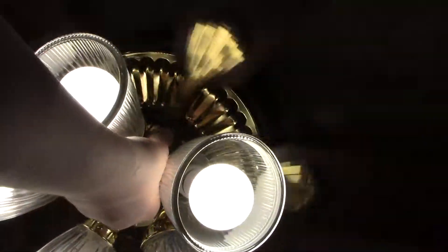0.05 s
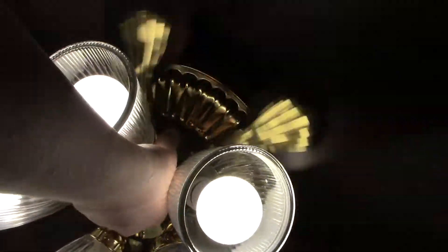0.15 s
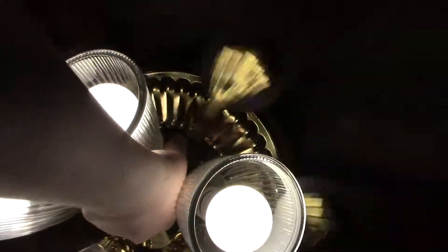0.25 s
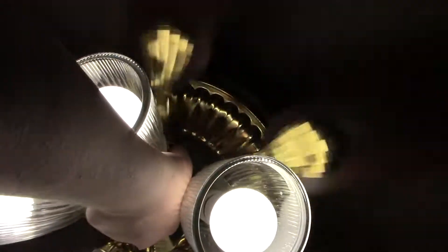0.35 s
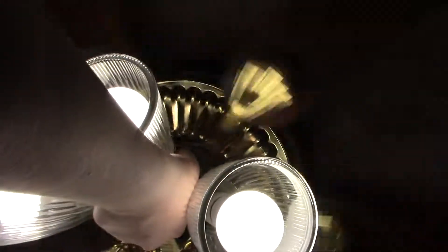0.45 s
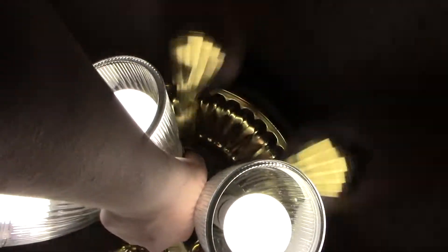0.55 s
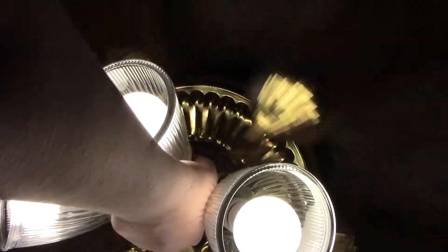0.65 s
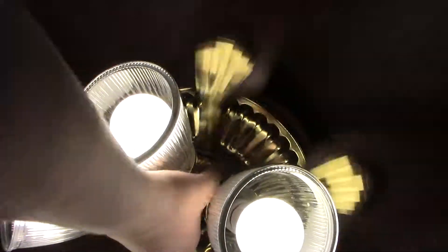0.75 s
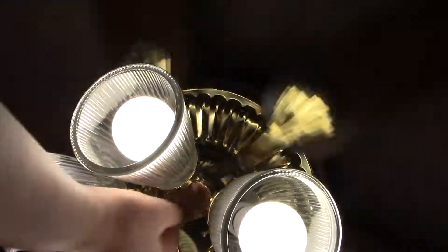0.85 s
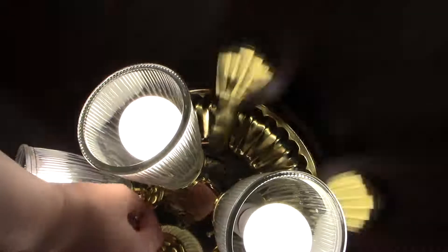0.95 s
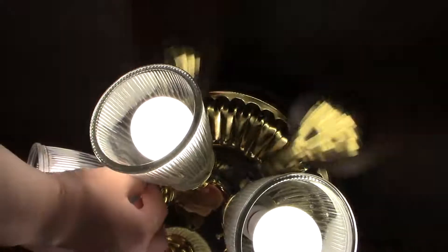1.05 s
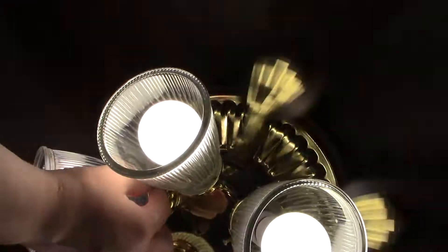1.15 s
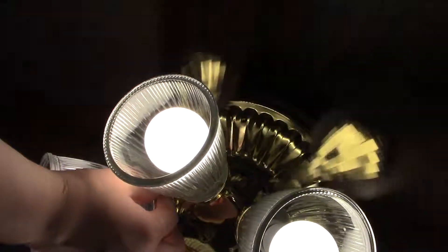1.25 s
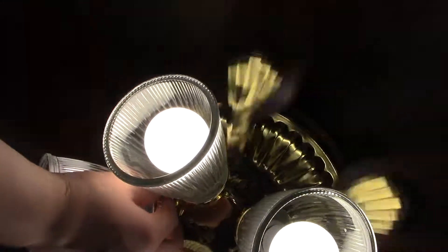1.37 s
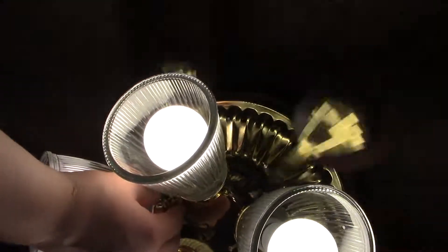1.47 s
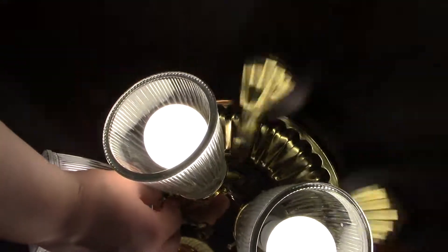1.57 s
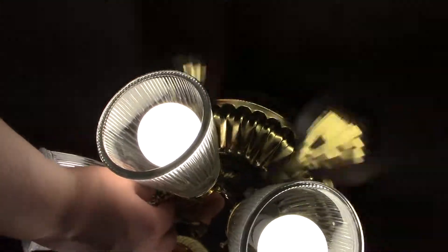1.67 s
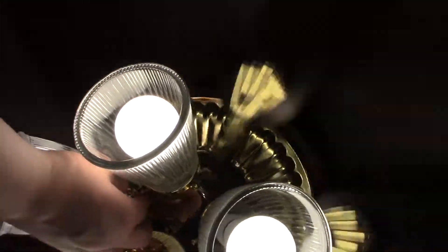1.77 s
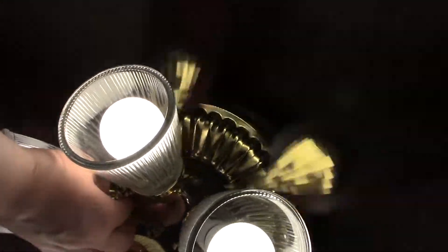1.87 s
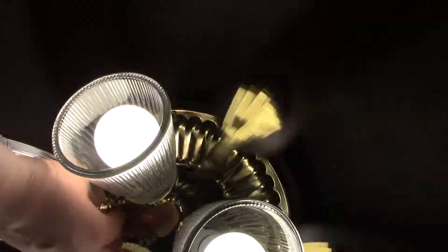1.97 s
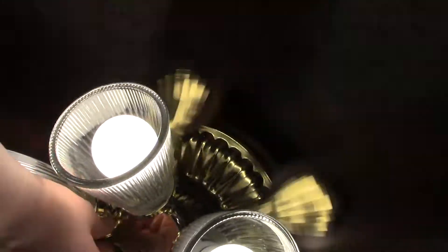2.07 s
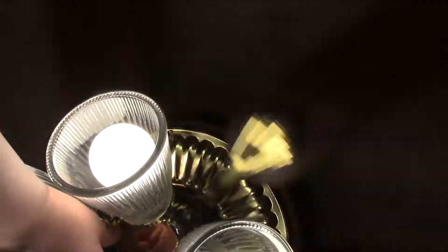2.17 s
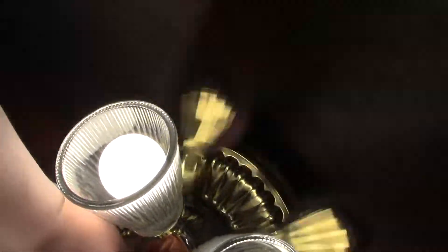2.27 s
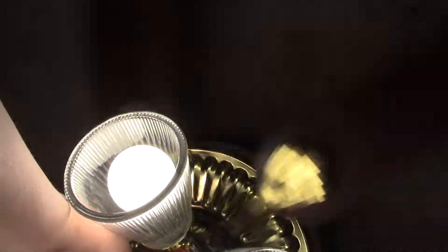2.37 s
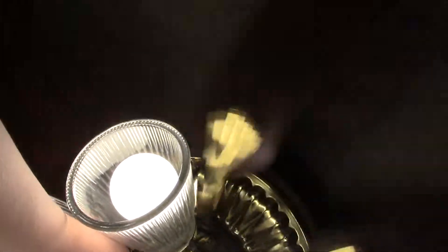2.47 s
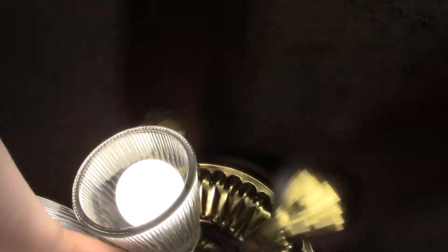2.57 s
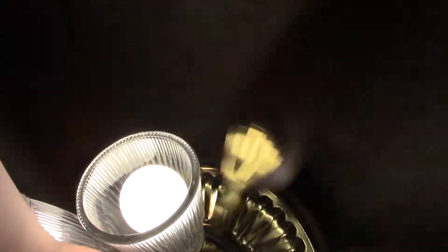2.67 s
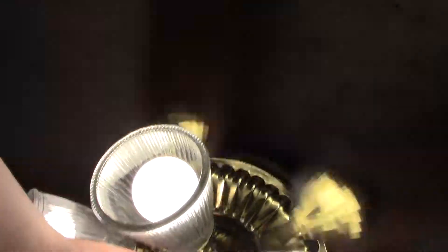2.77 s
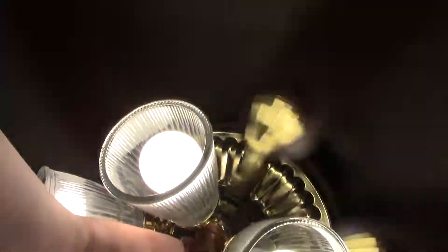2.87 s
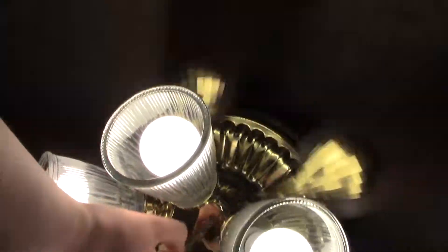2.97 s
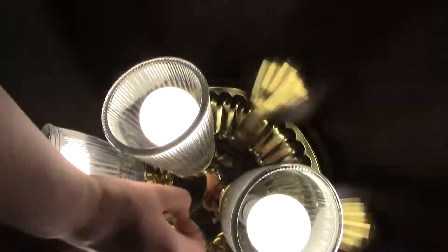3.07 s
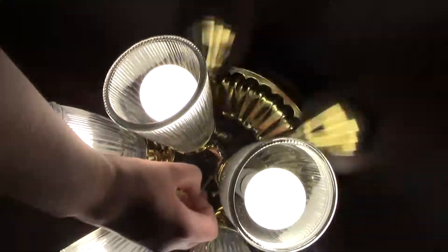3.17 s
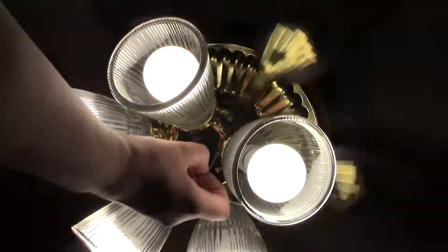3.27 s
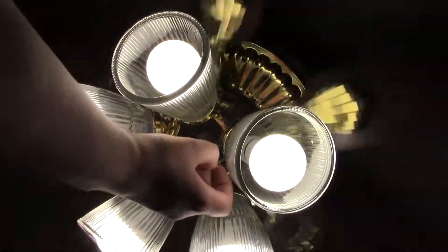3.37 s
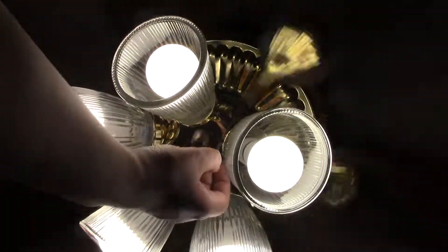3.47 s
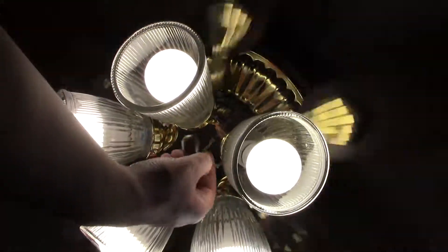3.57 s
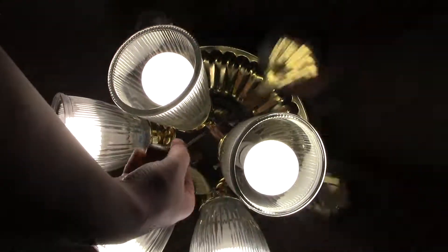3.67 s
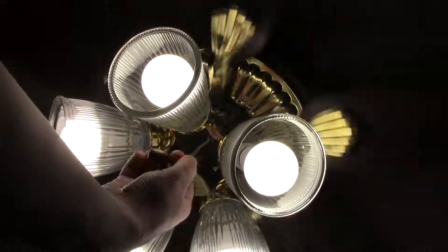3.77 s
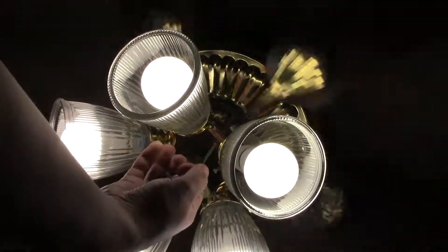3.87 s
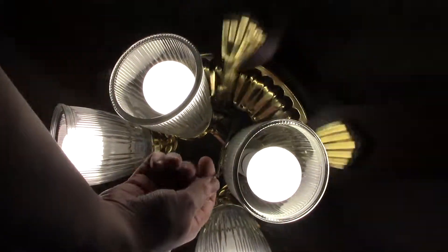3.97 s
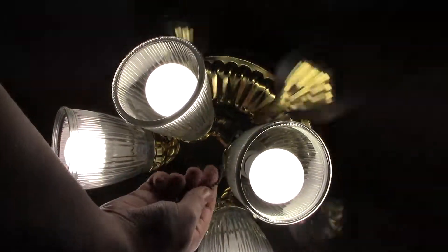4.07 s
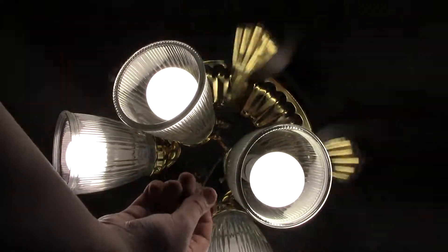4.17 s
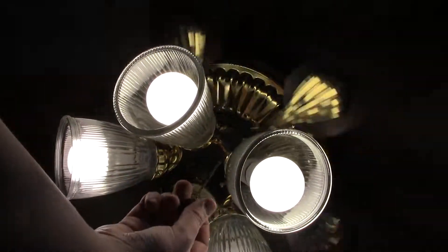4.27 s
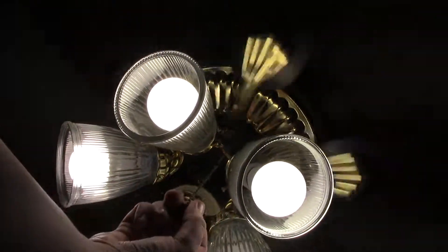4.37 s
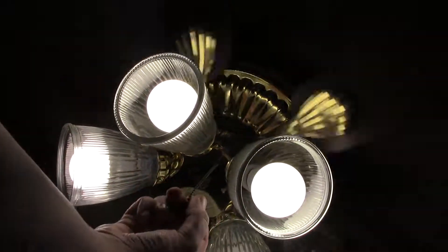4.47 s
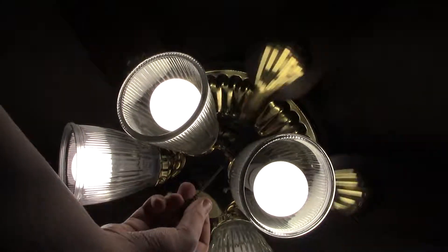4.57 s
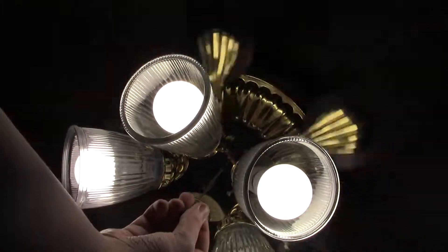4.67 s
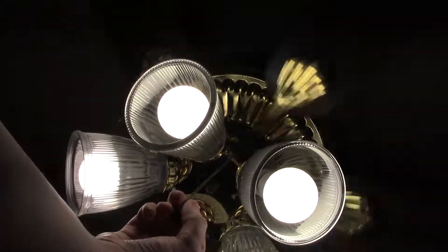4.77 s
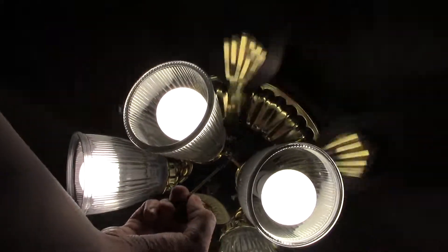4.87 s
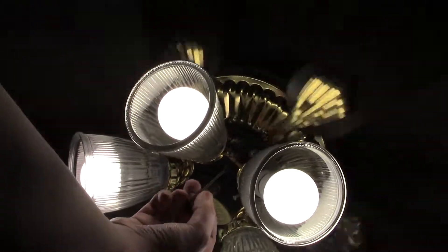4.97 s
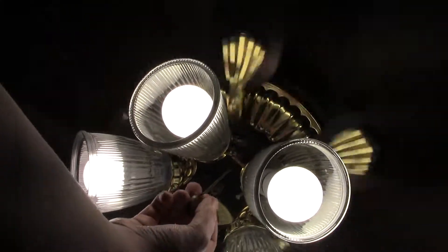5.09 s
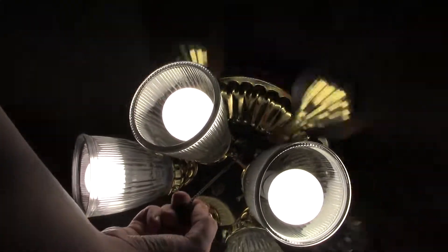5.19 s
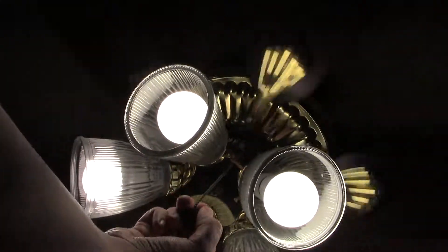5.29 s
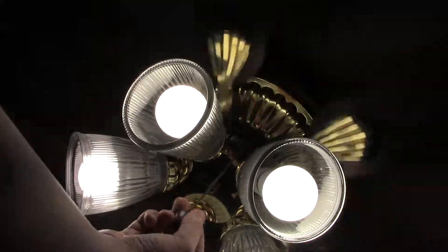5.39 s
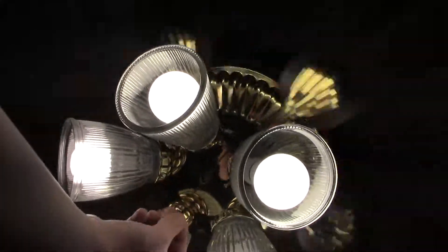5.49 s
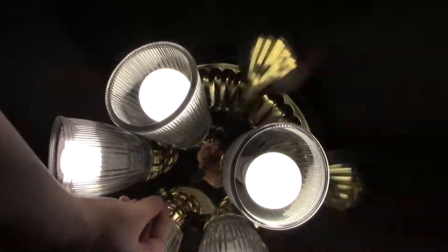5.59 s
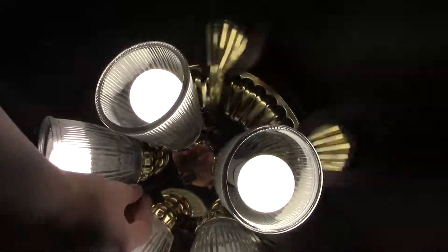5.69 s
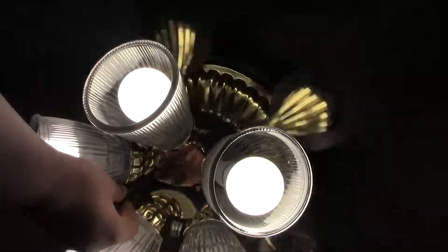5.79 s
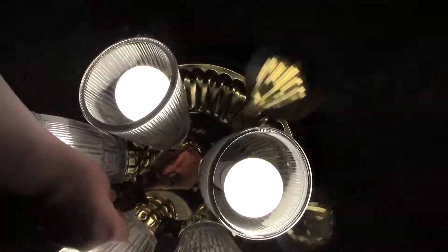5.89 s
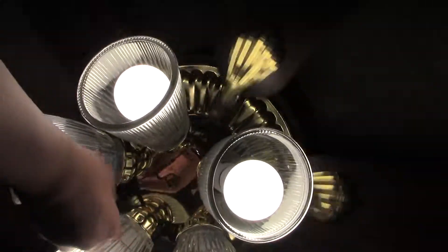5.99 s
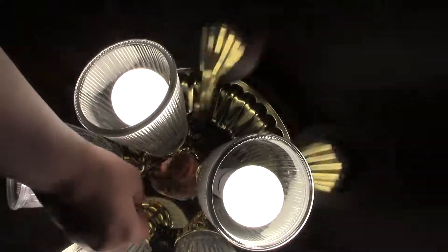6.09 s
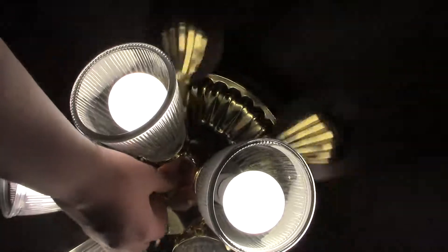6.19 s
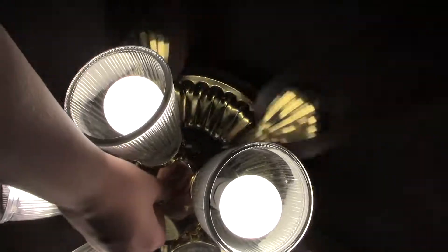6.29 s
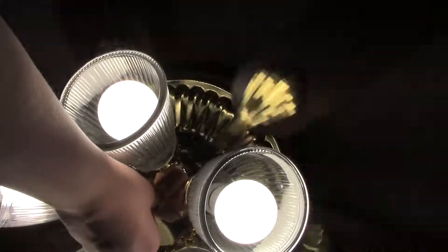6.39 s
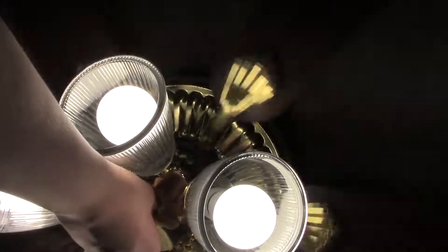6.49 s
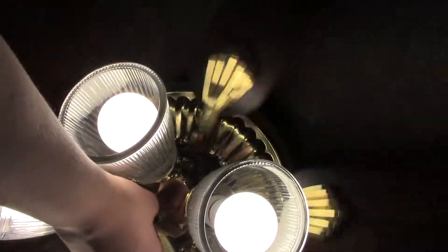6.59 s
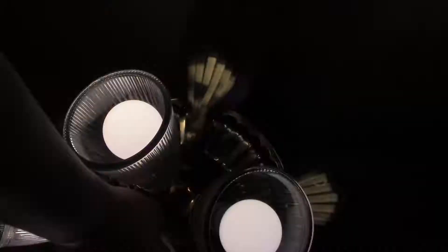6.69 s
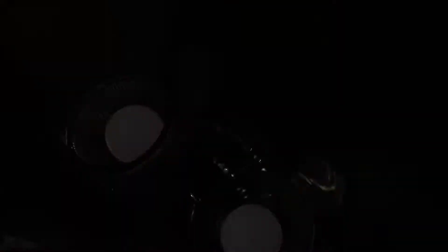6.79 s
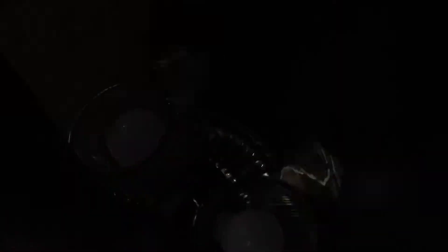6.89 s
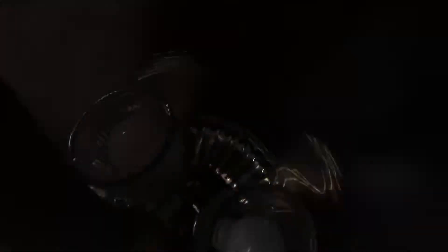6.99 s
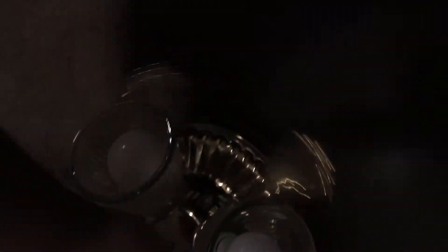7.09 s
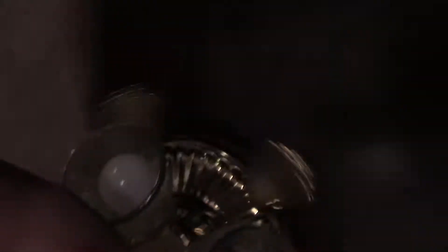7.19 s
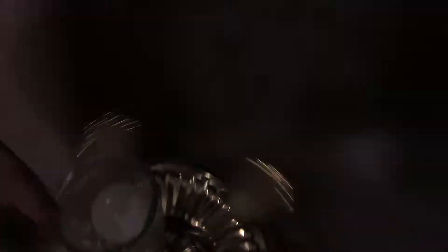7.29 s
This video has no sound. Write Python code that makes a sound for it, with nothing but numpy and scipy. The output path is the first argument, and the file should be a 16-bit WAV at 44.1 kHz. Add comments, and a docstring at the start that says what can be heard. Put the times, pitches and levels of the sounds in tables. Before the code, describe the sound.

Close to a ceiling fan's lamps, soft low air noise runs throughout. Light chain taps come first, then a sudden hard metallic and glassy clatter. After a few lighter tinkles, a pull chain ratchets over its brass lip and the switch snaps crisply several times. A bright jangle comes later, then soft rubbing, one more snap and a final knock. Dry, small indoor space, with a narrow stereo image.

```python
"""Pull chains under a ceiling fan

Close in a small room, a fan turns overhead with a wavering rush of air and a faint motor hum: shaped noise and sines.
A hand works the lamps' pull chains. Beads tinkle on glass and tick over the switch lip, and the switch snaps in its
brass housing: each contact rings damped modes under short noise, and the small room answers it with a grainy tail.
The microphone pair is close-spaced and nearly mono."""
import sys
import numpy as np
from scipy import signal
from scipy.fft import rfft, irfft, next_fast_len
from scipy.io import wavfile
from scipy.ndimage import map_coordinates

SR = 44100
rng = np.random.default_rng(int(sys.argv[2]) if len(sys.argv) > 2 else 0)


def wav_out(sig):
    """Save sig, one row per channel (or a flat mono array), as 16-bit PCM at SR to the path in sys.argv[1]."""
    wavfile.write(sys.argv[1], SR, np.round(np.clip(np.atleast_2d(sig).T, -1, 1) * 32767).astype(np.int16))


N = 323694

# ringing modes of the glass shades: pitch_hz, level_db, t60_s
GLASS = [(2536, -4.5, 0.132), (4210, -12.5, 0.11), (5340, -12, 0.37), (5660, -10, .09), (6020, -8, 0.12),
         (7170, -5, 0.12), (8780, -4.5, 0.15), (11170, -9.5, 0.12), (12300, -9.5, 0.18),
         (13380, -10.5, 0.1), (14150, -8.5, .11), (15340, -12.5, .08)]
# ringing modes of the brass housing: pitch_hz, level_db, t60_s
BRASS = [(624, -7, 0.29), (794, -3, 0.29), (980, -2, 0.068), (1113, -2, 0.26), (1323, 1.5, 0.14),
         (1690, -12, 0.21), (2228, -2, 0.093), (2334, -12, 0.12), (2396, -7.5, 0.073), (2697, -5.5, 0.096),
         (2910, -12, 0.048), (4177, -6.5, 0.16), (5000, -20.5, 0.13), (5530, -5.5, 0.19),
         (6950, -5.5, 0.11), (7720, -1.5, 0.12), (8740, -0.5, 0.055), (12100, -18, 0.028)]
# low register of contact noise: low_hz, high_hz, crack_db, crack_t60_s, tail_db, tail_t60_s
KNOCK = (694.5, 1804, -6.5, 0.0965, -26, 0.84)


def amp(db):
    """Gain of a level in dB."""
    return 10 ** (np.asarray(db) / 20)


def unit(x):
    """Scaled to rms 1."""
    return x / np.sqrt(np.mean(x ** 2) + 1e-20)


def along(points, hz):
    """Value at hz, read between (Hz, value) points on a log axis."""
    point_hz, value = np.transpose(points)
    return np.interp(np.log(hz + 1), np.log(point_hz + 1), value)


def wobble(rate):
    """A smooth random curve, rate knots a second."""
    knots = rng.standard_normal(int(N * rate / SR) + 4)
    return map_coordinates(knots, [np.arange(N) * rate / SR])


def filtered(x, response):
    """x shaped by a complex response of frequency."""
    m = next_fast_len(N + SR // 2)
    return irfft(rfft(x, m) * response(np.fft.rfftfreq(m, 1 / SR)), m)[..., :N]


def resonance(f, hz, width_hz):
    """Causal response of one resonance, 1 at its centre."""
    return 1j * f * width_hz / (hz * hz - f * f + 1j * f * width_hz)


def impulses(s, height):
    """A single-sample impulse of the given height at each time s."""
    return np.bincount(np.round(s * SR).astype(int), height, N)[:N]


def nearness(mode_hz, hz, width):
    """1 where a mode lies on the pitch struck, falling off over width in log frequency."""
    return np.exp(-(np.log(mode_hz / hz) / width) ** 2)


def ring(modes, s, levels_db, scatter_db, rough, shift=None, attack=0.00082, linger_db=-9):
    """Every blow at times s rings the modes at uneven levels; loose joints make their phase wander."""
    out = np.zeros(N + SR)
    t = np.arange(4800) / SR
    hz, db, t60 = np.transpose(modes)[..., None]
    # the contact damps most of the ring at once
    dying = amp(-60 * t / (0.23 * t60)) + amp(linger_db - 60 * t / t60)
    onset = 1 - np.exp(-t / attack)
    fade_out = np.cos(np.pi / 2 * t / t[-1])
    envelope = amp(db) * dying * onset * fade_out
    shift = np.ones(len(s)) if shift is None else shift
    chances = rng.standard_normal((len(s), len(modes), 152))
    for start, level, scale, chance in zip(s, levels_db, shift, chances):
        wander = np.repeat(np.cumsum(rough * chance[:, 2:], axis=1), 32, axis=1)
        mode_hz = hz * scale * (1 + .004 * chance[:, :1])
        tones = np.sin(2 * np.pi * mode_hz * t + wander + 2 * chance[:, :1])
        uneven = amp(level + scatter_db * chance[:, 1:2])
        out[round(start * SR):][:len(t)] += np.sum(uneven * envelope * tones, axis=0)
    return out[:N]


def burst(s, level_db, register):
    """Noise of one register: a crack at every blow, then a longer, grainy tail in the colour of the housing."""
    lo_hz, hi_hz, crack_db, crack_t60, tail_db, tail_t60 = register
    power = impulses(s, amp(2 * level_db))

    def dying(t60):
        # the powers of overlapping blows add
        return np.sqrt(signal.lfilter([1], [1, -amp(-120 / t60 / SR)], power))

    def housing_colour(f):
        top_hz = min(hi_hz, 3200)
        modes = sum(resonance(f, hz, 0.034 * hz) for hz, *_ in BRASS if lo_hz < hz < top_hz)
        return 1.074 + 0.53 * modes

    band = signal.butter(3, [lo_hz, hi_hz], "bandpass", fs=SR, output="sos")
    crack, tail = rng.standard_normal((2, N)) * np.sqrt(SR / 2 / (hi_hz - lo_hz))
    crack = amp(crack_db) * (dying(crack_t60) + 0.66 * dying(0.0029)) * crack
    tail = filtered(tail, housing_colour) * amp(tail_db + 2.45 * wobble(120)) * dying(tail_t60)
    return signal.sosfilt(band, crack + tail)


def fan():
    """Air rush with slow patches, a wavering motor hum, and a faint glassy shimmer, stronger around louder contacts."""
    # air and glassy shimmer over time: time_s, rush_db, shimmer_db
    course = [(0.0, -47.5, -61.5), (1.1, -47, -72.5), (2.55, -43.5, -66.5), (2.72, -43.5, -59),
              (3.72, -43, -67.5), (4.52, -42.5, -63.5), (7.34, -52.5, -74)]
    # relative spectrum of the air: frequency_hz, level_db
    rush_colour = [(15, -80.5), (25, -47), (100, -12), (154, -9.5), (192, -1.5), (422, -2), (669, -7.5),
                   (1150, -17.5), (1390, -17.5), (2530, -26), (4990, -35.5), (6920, -37.5), (15200, -52.5),
                   (16500, -68.5)]
    # how alike left and right are: frequency_hz, likeness (1 is mono)
    alike = [(30, .7), (60, 0.98), (240, 1), (950, 0.98), (3770, 0.85), (15000, 0.82)]
    # motor hum, before it wavers: pitch_hz, level_db
    motor = [(120, -67), (240, -62.5), (360, -58.5)]
    t = np.arange(N) / SR
    s, rush_db, shimmer_db = np.transpose(course)
    rush_db, shimmer_db = np.interp(t, s, rush_db), np.interp(t, s, shimmer_db)

    def mid_side(hz):
        turn = np.arccos(np.clip(along(alike, hz), -1, 1)) / 2
        return amp(along(rush_colour, hz)) * [np.cos(turn), np.sin(turn)]

    mid, side = filtered(rng.standard_normal((2, N)), mid_side)
    air = unit(np.array([mid + side, mid - side]))
    low = filtered(air, lambda hz: 1 / (1 + (hz / 1400) ** 4))
    hiss = amp(-44.5) * (air - low)  # the upper hiss stays even
    rush = amp(rush_db + 0.88 * wobble(8.5)) * low + hiss

    hum = sum(amp(db + 4.2 * wobble(4.4)) * np.sin(2 * np.pi * hz * t + 0.91 * wobble(6))
              for hz, db in motor)

    # about 4000 tiny grains a second, of uneven strength
    strength = amp(2.0 * rng.exponential(size=N)) * rng.standard_normal(N)
    grains = strength * (rng.random(N) < 4000 / SR)

    def glass_colour(f):
        modes = sum(amp(db / 2) * resonance(f, hz, 120) for hz, db, _ in GLASS)
        return (0.065 * (f > 2500) + modes) / (1 + (f / 6800) ** 4)

    return rush + hum + amp(shimmer_db) * unit(filtered(grains, glass_colour))


def hand():
    """Soft bumps shake the fitting at low, damped pitches; rubbing swells and fades as grainy noise."""
    # fingers and beads rubbing on the fitting: start_s, length_s, level_db, centre_hz
    rubs = [(0.032, 0.22, -56.5, 2500), (0.048, 0.26, -56, 5960), (0.722, 0.24, -57, 5400),
            (0.799, 0.097, -48.5, 1180), (1.397, 0.048, -49, 4240), (1.398, 0.055, -47.5, 1930),
            (2.151, 0.31, -59.5, 3800), (2.998, 0.041, -50, 7900), (4.794, 0.023, -29.5, 2180),
            (5.189, 0.026, -31.5, 1530), (5.985, 0.049, -26, 9400), (6.06, 0.143, -36, 1120),
            (6.281, 0.045, -48, 1310), (6.401, 0.14, -46.5, 1180), (6.688, 0.12, -32.5, 790),
            (6.865, 0.14, -31.5, 726), (6.902, 0.13, -47.5, 7900)]
    # soft bumps of the hand: start_s, level_db
    thuds = [(0.81, -32), (0.823, -37), (0.837, -27.5), (0.854, -37), (0.867, -32.5), (6.742, -25.5)]
    s, db = np.transpose(thuds)
    bump_modes = [(200, -10.5, .04), (341, -1.5, 0.046), (750, -5.0, 0.025)]  # pitch_hz, level_db, t60_s
    out = ring(bump_modes, s, db - 2, 0.96, 0.057, attack=0.0022, linger_db=7)
    for start, length, rub_db, hz in rubs:
        n = round(length * SR)
        grain_level = np.repeat(amp(4 * rng.standard_normal(n // 100 + 1)), 100)[:n]
        grain = rng.standard_normal(n) * grain_level
        f = np.fft.rfftfreq(n, 1 / SR)
        # the modes of the fitting colour the rub
        fitting = 1 + 1.1 * sum(resonance(f, c, 0.018 * c) for c, *_ in BRASS + GLASS)
        width_hz = 0.58 * hz * (hz / 1e3) ** .2  # wider in proportion at higher pitches
        rub = irfft(rfft(grain) * fitting * resonance(f, hz, width_hz) ** 2, n)
        swell = np.sin(np.pi * np.arange(n) / n)
        out[round(start * SR):][:n] += amp(rub_db) * unit(rub) * swell
    return out


def chain():
    """Beads ring the glass, most near the pitch struck; on the brass they give a drier, noisier tick."""
    # chain brushing the brass arms: start_s, level_db, pitch_hz (struck hardest)
    taps = [(0.1537, -38, 5600), (0.4746, -44, 4980), (0.7562, -39, 5290), (0.8016, -41, 5510),
            (1.0589, -35, 8260), (1.279, -43, 4900), (1.454, -31.5, 7120), (1.625, -28.5, 7170),
            (1.804, -31, 5850), (1.9654, -35.5, 7070), (2.0022, -40.5, 5050), (2.2552, -32, 8650),
            (2.435, -31.5, 7350), (2.5562, -20.5, 5560), (3.008, -34, 4200), (3.351, -32.5, 5460),
            (3.4142, -28.5, 5250), (3.7736, -34.5, 6870), (4.1553, -30, 9000), (5.5385, -34, 5800),
            (6.4383, -43.5, 7160), (6.4542, -41, 7640), (7.0656, -38, 4000)]
    # chain touching the glass: start_s, level_db, pitch_hz (struck hardest)
    tinks = [(2.6726, -22.5, 11100), (2.8614, -8.5, 11400), (3.0662, -24, 8800), (3.2142, -37, 13400),
             (3.431, -21, 11100), (3.9594, -20.5, 14200), (4.0035, -27.5, 8900), (4.026, -26, 6050),
             (4.0926, -23, 7120), (4.1678, -27.5, 8730), (4.2, -41, 13100), (4.2511, -12, 8800),
             (5.035, -30.5, 13500), (5.0927, -38, 5110), (5.4847, -35, 5740), (5.6562, -34.5, 12500),
             (5.691, -28.5, 5590), (5.952, -7, 7070), (5.9892, -11.5, 10600), (6.0005, -10.5, 5540),
             (6.0489, -5.5, 12300), (6.8976, -11.5, 13400), (6.974, -28, 5550), (6.988, -20, 5560)]
    # noise of a bead's tick: low_hz, high_hz, crack_db, crack_t60_s, tail_db, tail_t60_s
    tick = (3498, 13500.5, -10.5, 0.03, -24.5, 0.22)
    tap_s, tap_db, tap_hz = np.transpose(taps)
    arm_modes = [(.8, -2.5, .05), (1, 2, 0.096), (1.3, -8, 0.055)]  # pitch_ratio, level_db, t60_s
    arm = ring(arm_modes, tap_s, tap_db - 10.0, scatter_db=3, rough=.45, shift=tap_hz)

    s, db, hz = np.transpose(tinks)
    near = nearness(np.transpose(GLASS)[0][:, None], hz, 0.082)
    glass = ring(GLASS, s, (db + 5 * near - 13.5).T[..., None], scatter_db=4, rough=0.48)

    ticks = burst(np.append(s, tap_s), np.append(db - 3.5, tap_db), tick)
    housing_share = burst(s, db - 21.5, KNOCK)  # what the housing takes of a touch on the glass
    return glass + arm + ticks + housing_share


def contacts():
    """Columns of all housing contacts: start_s, level_db, knock_db, sizzle_db, knock_hz, clack_hz, sizzle_hz."""
    # knob and knuckles on the housing: start_s, level_db, knock_db, sizzle_db, knock_hz, clack_hz
    knocks = [(0.3758, -44, -46.5, -59, 1180, 1950), (0.4383, -49, -50, -58, 1230, 2250),
              (0.53, -58, -47, -55, 1280, 2260), (1.5263, -29, -30, -33.5, 1237, 4400),
              (1.7445, -34.5, -51, -67, 597, 2690), (2.5696, -23.5, -34.5, -36, 1330, 2300),
              (2.598, -24, -35, -45, 1080, 2100), (2.6458, -1, -15, -23, 1660, 2240),
              (2.6596, -18, -20.5, -37, 1660, 2170), (2.6724, -14, -23, -29, 1740, 2330),
              (2.713, -4, -16, -11, 1723, 4185), (2.7834, -12.5, -20, -26, 1380, 2750),
              (2.8606, -7.5, -14.5, -19, 1736, 1790), (2.9682, -21.5, -19, -34, 662, 2840),
              (3.0662, -7, -22.5, -18.5, 1315, 2474), (6.0294, -8, -18, -19.5, 1297, 2643),
              (6.0747, -20.5, -22.5, -33, 1274, 2280), (6.09, -31.5, -31.5, -32.5, 866, 2560),
              (6.133, -20.5, -27, -34, 1098, 2600), (6.3814, -43.5, -50.5, -54, 790, 2180),
              (6.4957, -48.5, -40.5, -54, 1194, 2120), (6.6127, -34.5, -44, -42, 716, 2880),
              (6.626, -33.5, -41, -39, 665, 2910), (6.7012, -41, -39.5, -46.5, 645, 2595),
              (6.7253, -27.5, -29.5, -34.5, 670, 2645), (6.8788, -39, -34.5, -42.5, 617, 5550),
              (6.919, -11, -18, -21, 1038, 5280)]
    # beads ticking over the switch lip: start_s, level_db
    beads = [(4.226, -36.5), (4.3251, -32), (4.351, -26.5), (4.3691, -25), (4.5155, -26.5), (4.5416, -26),
             (4.569, -22.5), (4.7831, -25.5), (4.9361, -27), (4.9535, -20.5), (5.1605, -33), (5.186, -25),
             (5.3505, -28), (5.376, -23), (5.881, -32), (5.9684, -24.5), (5.9817, -25)]
    # make-up of a bead's tick: knock_db and sizzle_db (over the tick), knock_hz, clack_hz, sizzle_hz
    bead = (-6.5, -1.5, 1229.5, 2447.5, 6952)
    # the switch snapping over: start_s, level_db, sizzle_db, knock_hz, sizzle_hz, rebound_db
    snaps = [(4.3764, -21, -16, 880, 8700, -21), (4.5826, -17, -15, 1135, 9620, -22),
             (4.813, -17.5, -9.5, 830, 8840, -19.5), (4.9724, -11.5, -8.5, 1063, 9200, -21),
             (5.2119, -15.5, -12.5, 1334, 9570, -20.5), (5.3984, -17, -14.5, 1114, 7170, -15.5),
             (6.743, -20, -6.5, 1185, 7790, -31)]
    # make-up of a rebound: knock_db and sizzle_db (over the rebound), clack_hz, sizzle_hz
    rebound = (-7, -6.5, 4399.5, 6899.5)
    snap_knock_db, snap_clack_hz, rebound_s = -12, 4950, .0102  # the knock lies under the sizzle
    rows = [(s, db, db + bead[0], db + bead[1], *bead[2:]) for s, db in beads]
    for s, db, sizzle_db, hz, sizzle_hz, back_db in snaps:
        rows.append((s, db, sizzle_db + snap_knock_db, sizzle_db, hz, snap_clack_hz, sizzle_hz))
        rows.append((s + rebound_s, back_db, back_db + rebound[0], back_db + rebound[1], hz, *rebound[2:]))
    knock_sizzle_hz = 6590
    rows += [(*row, knock_sizzle_hz) for row in knocks]
    return np.transpose(rows)


def housing():
    """Knocks, bead ticks and switch snaps: a short body at its own pitches, brass ringing near them, and noise."""
    # middle register of contact noise: low_hz, high_hz, crack_db, crack_t60_s, tail_db, tail_t60_s
    clack_register = (1805.5, 6002.5, -9, 0.0276, -24, 0.3436)
    # high register of contact noise: low_hz, high_hz, crack_db, crack_t60_s, tail_db, tail_t60_s
    sizzle_register = (6000.5, 12200.5, -5.5, 0.0022, -26.5, 0.24)
    s, db, knock_db, sizzle_db, knock_hz, clack_hz, sizzle_hz = contacts()

    # each brass mode takes its level from the register it lies in
    mode_hz = np.transpose(BRASS)[0][:, None]
    clack_db = db + 2 - 5 * np.abs(np.log2(mode_hz / clack_hz))
    upper_db = np.where(mode_hz < clack_register[1], clack_db, sizzle_db)
    register_db = np.where(mode_hz < KNOCK[1], knock_db, upper_db)
    near = sum(nearness(mode_hz, hz, 0.061) for hz in (knock_hz, clack_hz, sizzle_hz))
    brass = ring(BRASS, s, (register_db + 8 * near - 13).T[..., None], scatter_db=3.5, rough=0.19)

    cluster = [(.9, -4.5, 0.048), (1, -2.5, 0.096), (1.12, -5.5, .06)]  # pitch_ratio, level_db, t60_s
    body = ring(cluster, s, knock_db + 3.0, scatter_db=1.9, rough=0.095, shift=knock_hz)
    body += ring(cluster, s, db - 10.5, scatter_db=0.44, rough=.3, shift=clack_hz)
    body += ring(cluster, s, sizzle_db - 5, scatter_db=1.1, rough=0.93, shift=sizzle_hz)

    # the clack noise leans to the side of the pitch struck
    split_hz, lean_db_per_octave = 3180, 7.5
    lean_db = lean_db_per_octave * np.log2(clack_hz / split_hz)
    dull = (clack_register[0], split_hz, *clack_register[2:])
    bright = (split_hz, *clack_register[1:])
    clack = burst(s, db - 4.5 - lean_db / 2, dull) + burst(s, db - 3 + lean_db / 2, bright)
    return brass + body + clack + burst(s, knock_db, KNOCK) + burst(s, sizzle_db, sizzle_register)


def shades():
    """The glass bells keep a few modes sounding long after some of the blows."""
    # blows that leave a long chime: start_s, strength_db
    chime_blows = [(2.646, -4), (2.713, -9.5), (2.862, -9.5), (3.068, -7.5), (4.584, -16.5), (4.973, -14),
                   (6.744, -15)]
    # long ring of the shades: pitch_hz, level_db, t60_s
    chime = [(1393, -28, 0.37), (1704, -32, 0.67), (2590, -28.5, 0.19), (5200, -28.5, 0.23),
             (8960, -42.5, 0.28)]
    s, db = np.transpose(chime_blows)
    t = np.arange(SR // 2) / SR
    bell = sum(amp(mode_db - 60 * t / t60) * np.sin(2 * np.pi * hz * t) for hz, mode_db, t60 in chime)
    return signal.fftconvolve(impulses(s, amp(db)), bell)[:N]


def ports(x):
    """The two microphone ports share the sound and differ by its nearby reflections."""
    t = np.arange(SR // 20) / SR
    bright = np.diff(rng.standard_normal(len(t) + 1)) * amp(-60 * t / .03)
    full = .8 * rng.standard_normal(len(t)) * amp(-60 * t / 0.045)
    echoes = bright + full
    side = amp(-20.5) * signal.fftconvolve(x, echoes / np.linalg.norm(echoes))[:N]
    return np.array([x + side, x - side])


def scene():
    """The fan, the hand, and the hard parts of the fitting, too small to radiate bass."""
    small = signal.butter(3, 430, "highpass", fs=SR, output="sos")
    loose = signal.butter(3, 200, "highpass", fs=SR, output="sos")
    hard_parts = signal.sosfilt(small, chain() + housing() + shades())
    return fan() + ports(hard_parts + signal.sosfilt(loose, hand()))


def record(dry):
    """The loudest peaks round off; the very top rolls off and nothing stays above the band limit."""
    band_limit_hz = 16900
    rounded = dry / (1 + np.abs(dry / .91) ** 8) ** (1 / 8)

    def top(hz):
        shelf_db = -16 / (1 + np.exp((15900 - hz) / 120))
        return (hz < band_limit_hz) * amp(shelf_db)

    return filtered(rounded, top)


dry = scene()
out = record(dry)
wav_out(out)
```